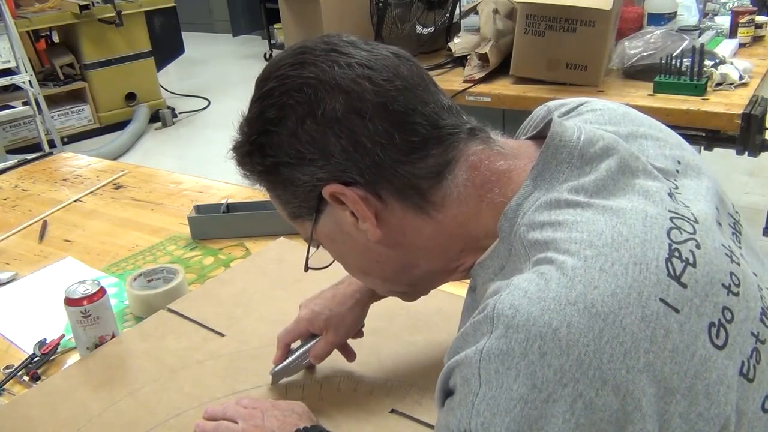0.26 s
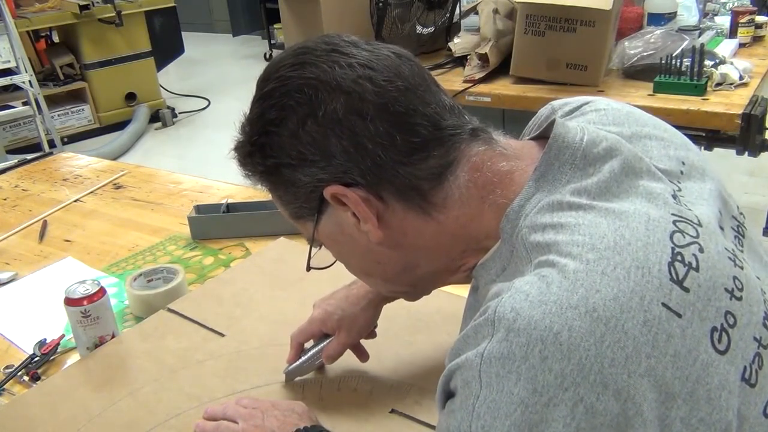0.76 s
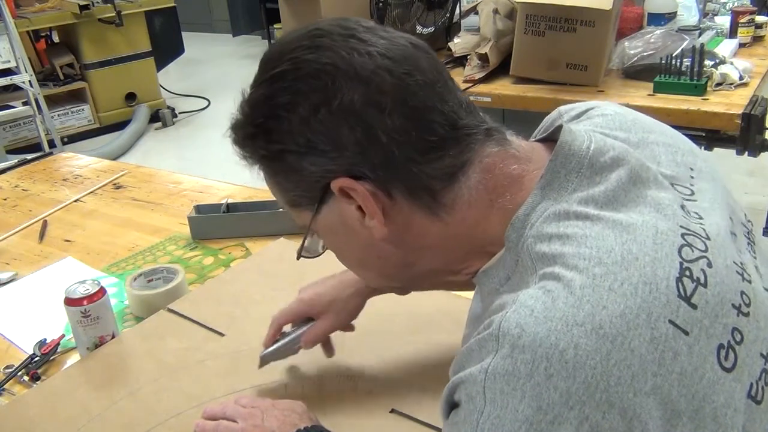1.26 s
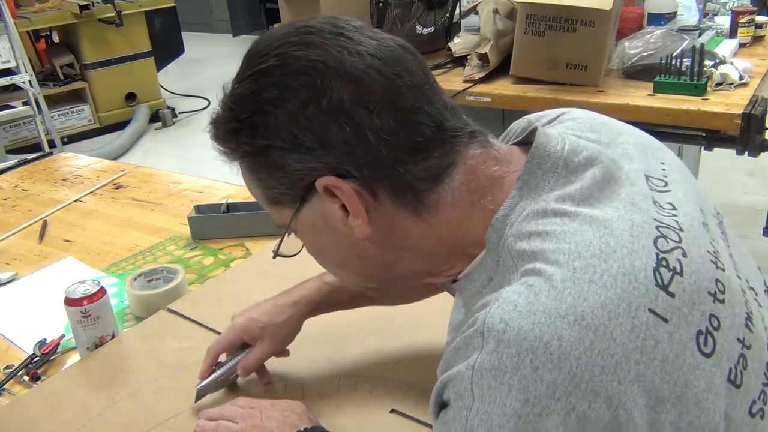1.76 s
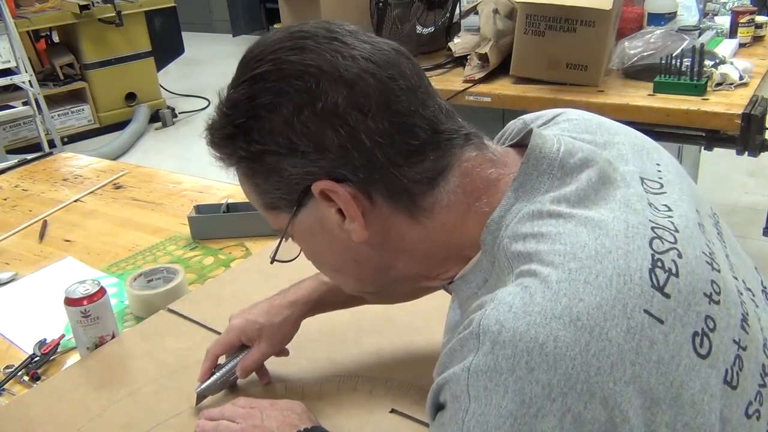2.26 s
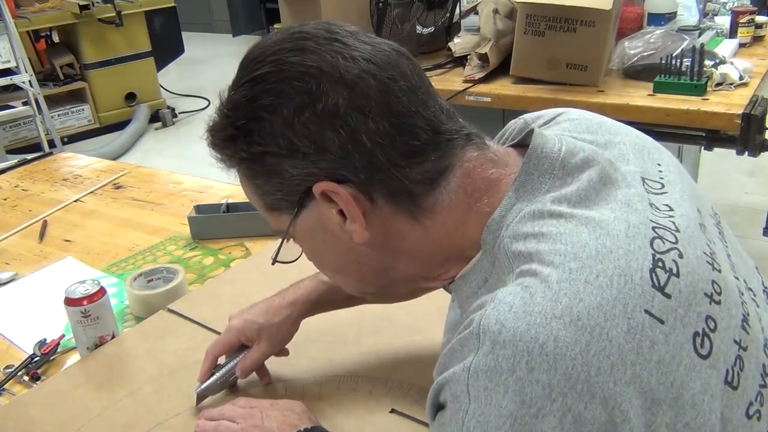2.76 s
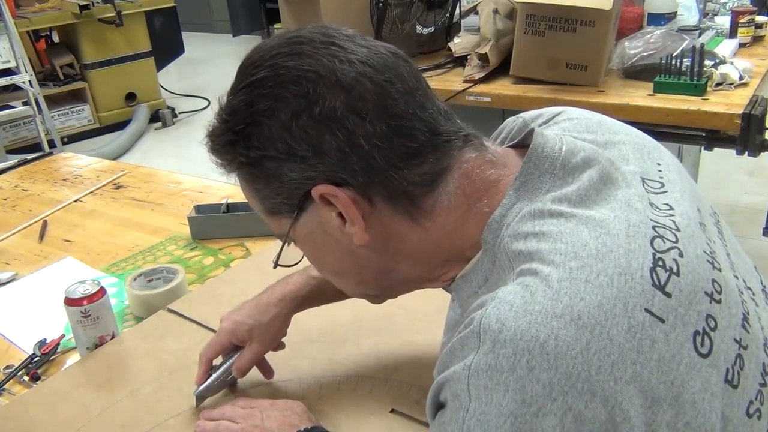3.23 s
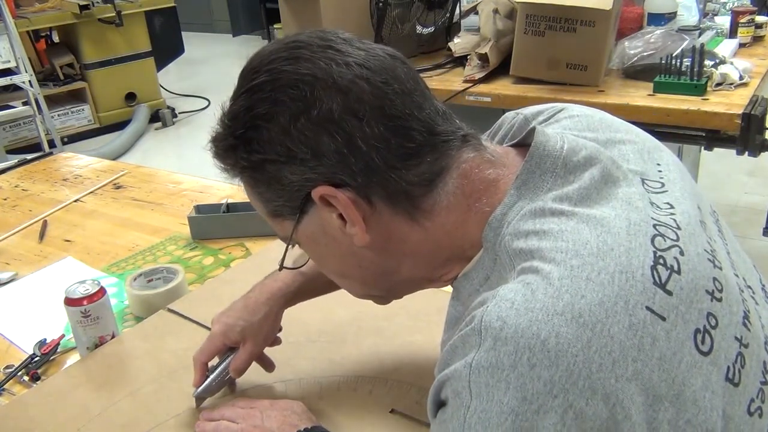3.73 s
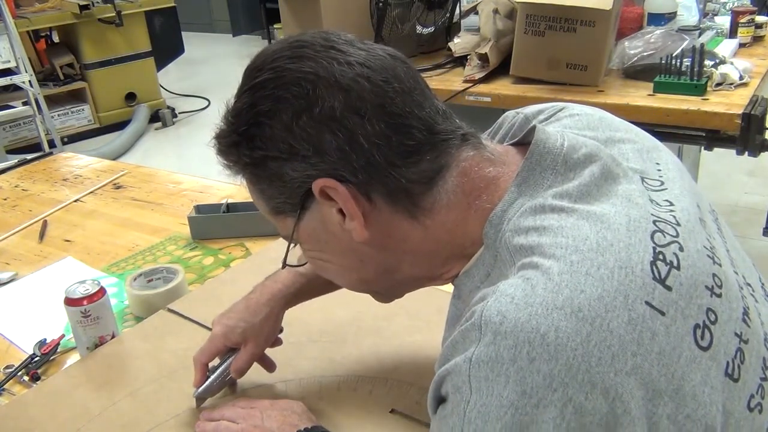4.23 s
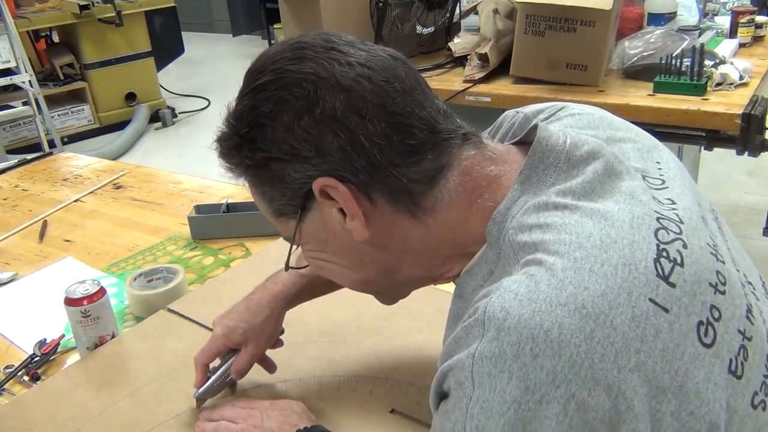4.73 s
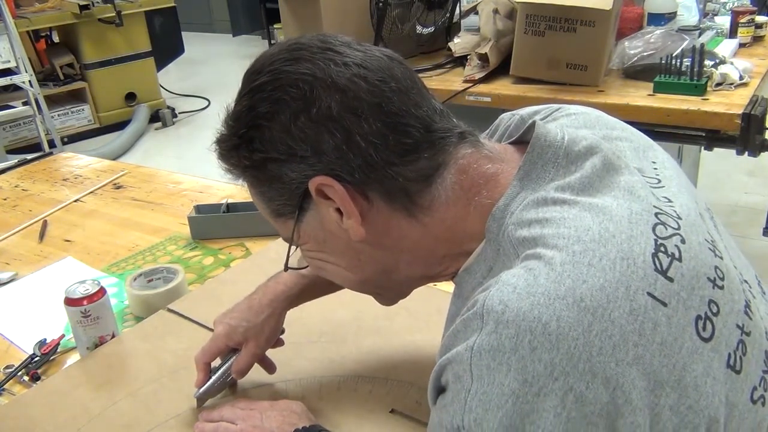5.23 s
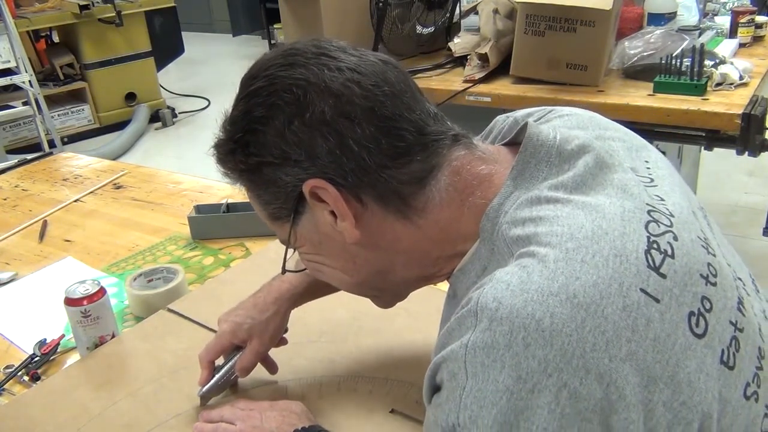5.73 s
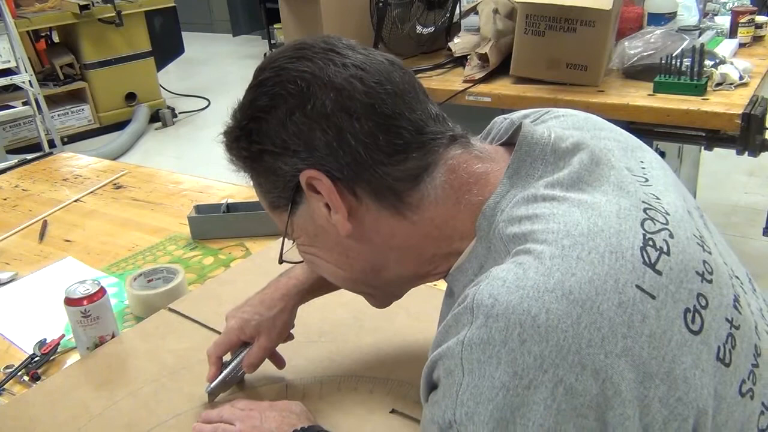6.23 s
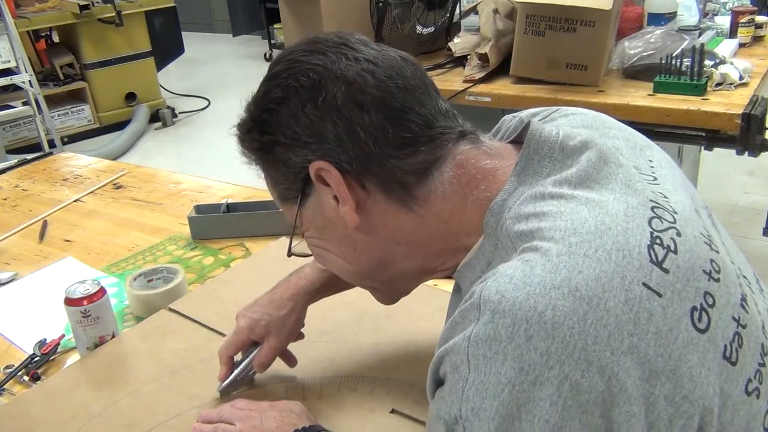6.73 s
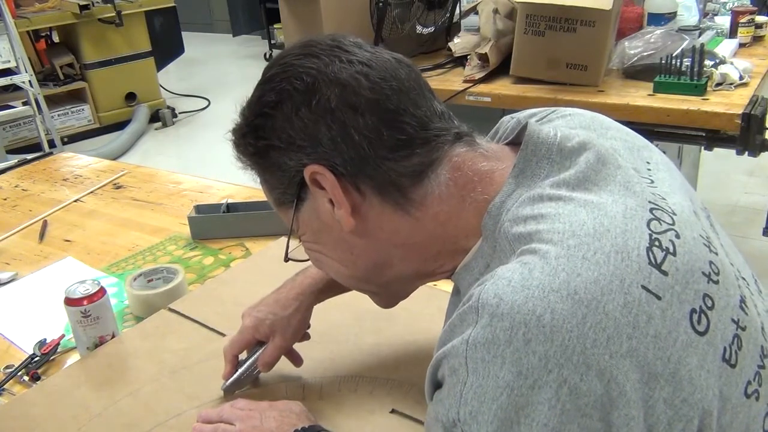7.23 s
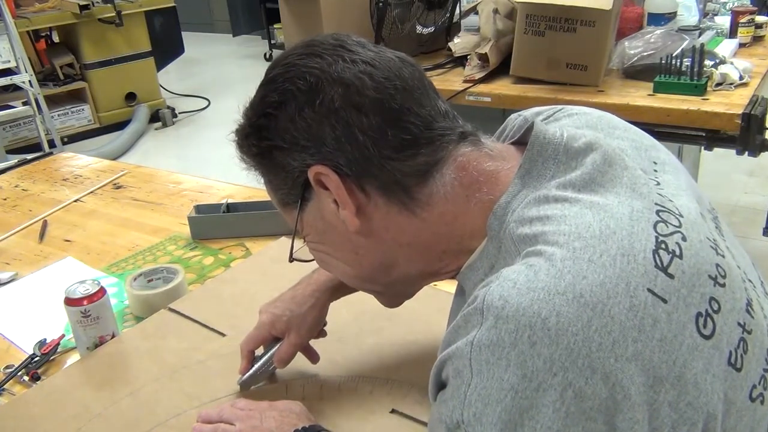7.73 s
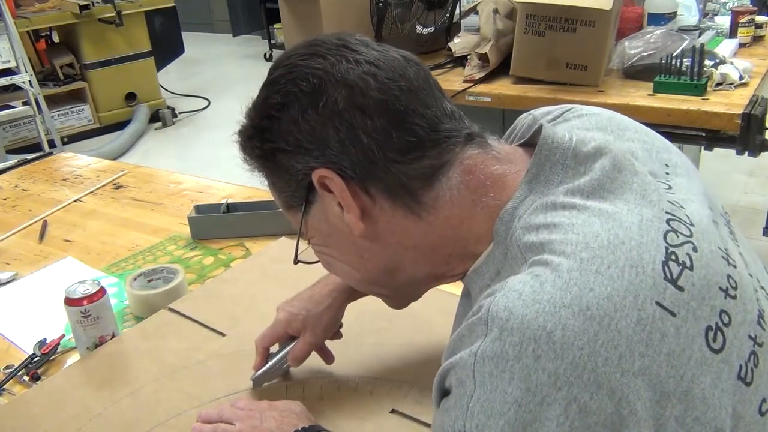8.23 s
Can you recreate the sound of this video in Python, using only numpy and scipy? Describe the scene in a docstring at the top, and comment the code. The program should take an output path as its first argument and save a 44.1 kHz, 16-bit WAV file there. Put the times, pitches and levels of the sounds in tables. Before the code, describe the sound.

A utility knife cuts thick cardboard on a workbench, close up and dry. Workshop ventilation rumbles softly throughout, with faint rapid mechanical ticking and a thin, very high whine. For the first second or so, short strokes make a dense, papery rasp with brief rips and sharp clicks, the strongest near 0.7 seconds. At about 1.5 seconds the knife body touches down with a light metallic tap amid a soft scrape. A pause follows, leaving only the background. At about 3 seconds a cluster of clicks restarts the cut, and the blade creeps on quietly, single fibres ticking. Between 5 and 5.7 seconds a few small hollow pops sound as the cardboard caves in, with a sharp snap near 5.6. From about 6 seconds the background sinks and short, jerky ripping strokes return, continuing unevenly until the end at about 8.5 seconds.

```python
"""A utility knife saws through thick cardboard on a workbench, close up. From the start, ventilation
rumbles, a small mechanism ticks faintly and a thin whine sits on top. Short strokes part the fibres in a
dense rasp, the blade jerks forward in brief rips, and the knife body touches down once. After a pause
the blade creeps on from about 3 s: lone fibres tick and a few flutes cave in with hollow pops.
From about 6 s the background sinks and short, ripping strokes return."""
import sys
import numpy as np
from scipy import signal
from scipy.fft import rfft, irfft
from scipy.io import wavfile
from scipy.ndimage import uniform_filter1d

SR = 44100
rng = np.random.default_rng(int(sys.argv[2]) if len(sys.argv) > 2 else 0)


def waveform_to_disk(signal):
    """Save audio, clipped to [-1, 1], as 16-bit WAV at the path in sys.argv[1]."""
    frames = np.transpose(np.atleast_2d(signal))
    scaled = np.clip(frames, -1, 1) * 32767
    samples = np.round(scaled).astype(np.int16)
    wavfile.write(sys.argv[1], SR, samples)


N = 373968
HZ = np.fft.rfftfreq(N, 1 / SR)
TIME = np.arange(N) / SR


def undb(db):
    """Decibels to gain."""
    return 10 ** (np.asarray(db) / 20)


def level(x, db):
    """Scale to an rms level."""
    return x * undb(db) / np.sqrt(np.mean(x ** 2))


def eq_curve(table):
    """Spread (f/Hz, level/dB) points over the FFT bins."""
    hz, db = np.transpose(table)
    return np.interp(np.log(HZ + 1), np.log(hz), db)


def colour(x, table):
    """Shape a sound with an EQ curve."""
    return irfft(rfft(x) * undb(eq_curve(table)), N)


def ring(x, modes, sway={}):
    """Damped resonances of alternating sign; sway rides single modes over time (index: gain/dB)."""
    s = 1j * HZ
    gains = [(-1) ** k * undb(db) * s * width / (s * s + s * width + hz * hz)
             for k, (hz, width, db) in enumerate(modes)]
    response = sum(gains)
    swell = sum(rfft(x * (undb(db) - 1)) * gains[k] for k, db in sway.items())
    return irfft((rfft(x) * response + swell) / np.sqrt(np.mean(np.abs(response) ** 2)), N)


def ping(at, peak_db, hz, width_hz):
    """One struck mode: the wider it is, the sooner it dies."""
    t = np.maximum(TIME - at, 0)
    return undb(peak_db) * np.exp(-np.pi * width_hz * t) * np.sin(2 * np.pi * hz * t)


def drift(rate_hz):
    """Smooth random modulation with a spread of 1."""
    hold = int(SR / rate_hz)
    steps = np.repeat(rng.standard_normal(N // hold + 1), hold)
    smooth = uniform_filter1d(uniform_filter1d(steps, hold), hold)[:N]
    return smooth / smooth.std()


def stereo_noise(width):
    """Noise of a spread-out source, mostly alike in both ears."""
    mid, side = rng.standard_normal((2, N))
    return np.array([mid + width * side, mid - width * side]) / np.hypot(1, width)


def ventilation():
    """Air rumbles and the ducts ring in slow swells; the bass is centred, the treble wide."""
    # moving air: f/Hz, relative density/dB
    air_spectrum = [(15, -56), (33, -17), (138, -2), (252, -12), (296, -8), (746, -31), (878, -34),
                    (1320, -42), (1640, -43.5), (2210, -46), (3410, -49.5), (3810, -51), (12200, -59),
                    (15200, -56), (16500, -69)]
    # duct modes: f/Hz, width/Hz, gain/dB
    duct_modes = [(112.5, 13.8, -1.5), (138.2, 15.7, 2.5), (219.1, 12.8, -1), (303.3, 15.4, -6),
                  (448.7, 24.7, -16), (864, 21.6, -25), (1082, 66, -34.5), (1613, 19, -36.5)]
    # air that only one side hears: f/Hz, level/dB re shared air
    apart = [(30, -22), (100, -20.5), (300, -17.5), (1000, 0), (3000, 3.0), (8000, 8.5)]
    mid, left, right = (colour(rng.standard_normal(N), air_spectrum) for _ in range(3))
    air = mid + np.array([colour(left, apart), colour(right, apart)])
    ducts = ring(rng.standard_normal(N), duct_modes)
    ducts = signal.sosfilt(signal.butter(2, 80., "high", fs=SR, output="sos"), ducts)
    return level(air, -3.03) + level(ducts, -3.5) * undb(3.56 * drift(3.15))


def mechanism():
    """Evenly timed ticks of uneven strength ring one small resonance, over a weak tone."""
    # steady tone: f/Hz, level/dB re rumble
    partials = [(1631, -42)]
    rate_hz, ring_hz = 29.97, 3372
    beat = np.diff(np.floor((TIME - .0125) * rate_hz), prepend=0)
    beat = beat * undb(3.2 * rng.standard_normal(N))
    tick = ring(ring(beat, [(ring_hz, 100, 0)]), [(ring_hz, 500, 0)])
    tone = sum(undb(db) * np.sqrt(2) * np.sin(2 * np.pi * hz * TIME) for hz, db in partials)
    return level(tick, -39.0) + tone


def whine(pitch_hz=15734.3, flutter_hz=12.92):
    """A thin, very high tone that flutters evenly."""
    flutter = 1 + .5 * np.cos(2 * np.pi * flutter_hz * (TIME - 2.046))
    return flutter * np.sin(2 * np.pi * pitch_hz * TIME)


def reflections(x, t60_s):
    """Short diffuse tail of bench and walls, different in each ear."""
    t = np.arange(SR // 2) / SR
    tail = rng.standard_normal((2, len(t))) * 10 ** (-3 * t / t60_s) * (t > .0004)
    return signal.fftconvolve(x[None], tail / np.sqrt(np.sum(tail ** 2) / 2), axes=1)[:, :N]


def knife_tap(at=1.4895):
    """The knife body touches down with a small metallic ring."""
    # knife body modes: peak/dB, f/Hz, width/Hz
    body_modes = [(-39, 3360, 16), (-37, 3240, 60)]
    return sum(ping(at, *mode) for mode in body_modes)


def flute_pops():
    """Flutes of the cardboard cave in, each with a hollow pop."""
    # collapsing flutes: t/s, peak/dB, f/Hz
    pops = [(4.957, -32, 1240), (5.104, -25, 1050), (5.428, -33, 1410), (5.706, -28, 1350)]
    return sum(ping(*pop, width_hz=60) for pop in pops)


def shares(level_db, board_db, bright_db):
    """Power for board, paper edge and blade; brightness tips the balance from edge to blade."""
    top = 1 / (1 + undb(-bright_db) ** 2)
    return undb(level_db) ** 2 * np.array([undb(board_db) ** 2, 1 - top, top])


def fibres(rate_hz, scatter_db, decay_ms):
    """Grain envelope of breaking fibres: random clicks of scattered size, each dying fast; rms 1."""
    breaks = rng.random(N) < rate_hz / SR
    sizes = undb(scatter_db * np.minimum(rng.exponential(size=N), 4))
    return level(signal.lfilter([1], [1, -np.exp(-1000 / (decay_ms * SR))], breaks * sizes), 0)


def clicks(stroke_bright_db):
    """Sharp clicks, as spikes of power: fibres snapping, and the click of the knife touching down."""
    # sharp clicks: t/s, level/dB, board tone/dB re level
    events = [(0.17, -30.5, -18), (0.222, -38, -15.5), (0.246, -32, -9), (0.3125, -17, -14),
              (0.5277, -23, -11), (0.585, -30, -9), (0.713, -12, -18), (1.4894, -38.5, 11.5),
              (2.9749, -22, -2), (2.9815, -28, -7), (2.9876, -23, -5), (3.0265, -18.5, 4), (3.042, -30, -8),
              (3.055, -20, -0.5), (3.0612, -22.5, -1.5), (3.066, -30, -2), (3.132, -24, -2),
              (3.1369, -16, -3), (3.151, -18, 2.5), (3.181, -30, -12), (3.194, -29, 0), (3.245, -15, 0),
              (3.2608, -22, -16), (3.5738, -30, -8), (3.622, -38.5, -10), (3.7051, -36.5, -9),
              (3.803, -35, -8), (4.1068, -38.5, 3), (4.377, -33, -8), (4.427, -34, -14), (4.482, -30, 0),
              (4.5313, -27, -3), (4.592, -31.5, -4), (4.7676, -35.5, -7), (5.283, -29, -5),
              (5.3, -28.5, -1), (5.3142, -20.5, -6.5), (5.486, -27, -9), (5.63, -13.5, -19),
              (5.641, -31, -10), (5.969, -27, -12), (6.0752, -31, -14), (6.505, -20, -6), (6.6274, -23, -1)]
    t = np.arange(SR // 40) / SR
    spike = (np.exp(-t / 0.001) - np.exp(-t / 0.000091)) ** 2
    power = np.zeros((3, N))
    for at, click_db, board_db in events:
        i = int((at - .0008) * SR)
        bright_db = 0.94 * stroke_bright_db[i] + 3.0  # a click takes the colour of its stroke
        power[:, i:i + len(t)] += 2.4 * np.outer(shares(click_db, board_db, bright_db), spike)
    return power


def rips():
    """The blade jerks forward and tears many fibres at once: brief, fine-grained humps of power."""
    # jerks: centre t/s, level/dB, length/ms, board tone/dB re level, brightness/dB
    jerks = [(0.301, -15, 9.7, -6, -2), (0.4, -29.5, 51, -8, 4), (0.508, -36.5, 7.1, -8, 12),
             (0.63, -21, 17.3, -4.5, -5), (0.697, -19, 9.3, -3.5, 1.5), (5.069, -30, 8.2, -1.5, -6),
             (5.617, -16, 6, -1, -3.5), (6.127, -23, 11.3, -1.5, 3), (6.15, -22, 10, -8, 8),
             (6.412, -17, 7, 1.5, -1.5), (6.448, -20, 1.9, -7, -5), (6.478, -30, 4.1, 5, -1),
             (6.487, -23, 6.6, 3, 0.5), (6.704, -27, 5.4, -8, -3), (7.266, -34, 14, -10, -3),
             (7.298, -29, 10.6, 1, -1), (7.514, -32.5, 5.3, -4, 1), (7.568, -30.5, 19, 0.5, 1),
             (7.725, -29.5, 5.2, -2, 3), (7.785, -27.5, 9.8, 0.5, 3), (8.014, -26.5, 3.9, -4, -5),
             (8.079, -34, 19, 1.5, -3), (8.266, -33, 19, -3, 3), (8.344, -32.5, 17, 3, 0)]
    power = np.zeros((3, N))
    for at, rip_db, length_ms, board_db, bright_db in jerks:
        hump = np.hanning(int(2.56 * length_ms * SR / 1000)) ** 2
        i = int(at * SR) - len(hump) // 2
        power[:, i:i + len(hump)] += 1.18 * np.outer(shares(rip_db, board_db, bright_db), hump)
    return power * fibres(rate_hz=8000, scatter_db=0.65, decay_ms=0.58) ** 2


def strokes():
    """Each push rises, holds and dies away; gives power for board, edge and blade, and brightness/dB."""
    # pushes of the blade: full pressure t/s, hold/ms, level/dB, rise/ms per 20 dB,
    # board tone/dB re level, brightness/dB
    pushes = [(.094, 5, -43, 283, -2.5, 1.5), (.3, 3.4, -32.5, 29, 2.5, -3), (.412, 3.6, -41, 147.5, 2, 3),
              (.47, 190, -40.5, 60, -3.5, 1), (.704, 5.7, -35, 150, -3, -3), (0.811, 1, -30, 79, -4.5, 0),
              (.87, 65, -59.5, 53, -25.5, -8), (.996, 67, -41.5, 93, -23, -4), (1.1, 5, -33.5, 228, -3, 11),
              (1.35, 92, -43.5, 100, -1, 3), (1.55, 31, -43, 100, 1, 4), (2.979, 64, -42.5, 23, 3.5, -3.5),
              (3.145, 9, -40, 92, 6, -3.5), (3.258, 6.4, -40, 48, 4, -2.5), (3.675, 5, -49.5, 324, 1, -2),
              (3.85, 440, -55.5, 150, -2, 0), (4.419, 5.6, -44.5, 338, 1.5, 2),
              (5.073, 8, -41.5, 404, 1, -1), (5.3, 190, -44, 204, 1, 0.5), (5.469, 2, -38.5, 98, 1.5, -2),
              (5.59, 6.6, -46, 157, 0, -5), (5.621, 1.8, -27, 53, -2.5, -5), (5.72, 79, -42.5, 65, -1, -1),
              (6.11, 5, -41, 311, 2.5, 0), (6.14, 9.5, -31, 27, 3.5, 3), (6.19, 12, -57, 30, 0, 2),
              (6.39, 10, -46.5, 127, 4, 4), (6.413, 94, -38, 12, 2.5, -4), (6.63, 72, -40, 10, -4, 0.5),
              (6.712, 2.5, -36, 75, 1.5, -2), (6.9, 49, -46.5, 29, -1, -0.5),
              (7.298, 3, -31.5, 61, -0.5, -2), (7.52, 77, -38, 35, -1, 0), (7.63, 16, -44, 30, 0, -2),
              (7.729, 49, -32.5, 29, -3.5, -2), (8.021, 44, -33.5, 66, -4, 0.5),
              (8.13, 48, -47.5, 40, -1.5, 0), (8.346, 12, -36, 171, -2.5, 0)]
    # the blade catches and the stroke stops dead: t/s
    catches = [1.108, 3.8, 6.135]
    t = TIME[::44]
    power, bright = np.zeros((3, len(t))), np.zeros(len(t))
    for at, hold_ms, rasp_db, rise_ms, board_db, bright_db in pushes:
        fall_ms = max(80.5, 0.99 * rise_ms)  # a slow push fades about as slowly as it rose
        since_ms = 1000 * (t - at)
        drop_db = 20 * np.maximum(np.maximum(-since_ms / rise_ms, (since_ms - hold_ms) / fall_ms), 0)
        moving = t < min([s for s in catches if s > at], default=np.inf)
        push = np.outer(shares(rasp_db, board_db, bright_db), moving * undb(-drop_db) ** 2)
        power += push
        bright += bright_db * (push[1] + push[2])
    bright /= power[1] + power[2] + 1e-30
    return np.array([np.interp(TIME, t, p) for p in power]), np.interp(TIME, t, bright)


def rasp(power, creep_s=(3.1, 6.1)):
    """Grain on the strokes' power: a fast blade parts fibres in a stream, a creeping one singly."""
    power = power * undb(1.5 * drift(120)) ** 2  # stick and slip: the drag stutters
    drag_db = 10 * np.log10(power[1] + power[2] + 1e-30)
    power = power * undb(2.0 * np.array([drift(30) for _ in range(3)]))  # the contact shifts
    creep = np.clip((-39 - drag_db) / 12, 0, 1) * (TIME > creep_s[0]) * (TIME < creep_s[1])
    dense = fibres(rate_hz=5000, scatter_db=4.6, decay_ms=0.67)
    sparse = fibres(rate_hz=450, scatter_db=4.5, decay_ms=0.4)
    return power * ((1 - creep) * dense + creep * sparse) ** 2


def knife_cut():
    """Rasp, rips and clicks drive noise that rings the board, the cut paper edge and the blade tip."""
    # modes of the three parts: f/Hz, width/Hz, gain/dB
    board_modes = [(582, 58, 8), (1032, 96, 15), (1235, 79, 12), (1412, 460, 6), (1989, 185, 8),
                   (2710, 450, 4)]
    edge_modes = [(3690, 480, -5.5), (4400, 380, -1), (5050, 610, -1), (5755, 344, 2), (6900, 790, -0.5)]
    blade_modes = [(8130, 1140, 2), (9610, 920, 1), (11470, 1750, -2), (14100, 1500, -10.5)]
    # modes swell as the cut moves on: t/s, board 2nd/dB, board 3rd/dB, edge 4th/dB, blade 2nd/dB
    mode_rides = [(1.6, -0.5, -0.5, 0, 2), (2.9, 4, 1.5, 8, 2), (3.5, -2, 2, 0, 3.5),
                  (4.7, -0.5, 0, 0.5, 3), (5.8, -1.5, -4.5, -0.5, 2), (6.2, -3.5, 4.5, 2, 0.5)]
    stroke_power, bright_db = strokes()
    power = rasp(stroke_power) + rips() + clicks(bright_db)
    board_drive, edge_drive, blade_drive = np.sqrt(power)
    times, *rides_db = np.transpose(mode_rides)
    low_db, high_db, edge_db, tip_db = (np.interp(TIME, times, db) for db in rides_db)
    board = ring(board_drive * stereo_noise(width=.22), board_modes, {1: low_db, 2: high_db})
    edge = ring(edge_drive * stereo_noise(width=.4), edge_modes, {3: edge_db})
    blade = ring(blade_drive * stereo_noise(width=.42), blade_modes, {1: tip_db})
    return board + edge + blade


def scene():
    """The knife and its reflections over the workshop bed."""
    # the bed sinks and creeps back while the whine fades: t/s, bed fader/dB, whine fader/dB
    faders = [(0, -24, -52), (.42, -27, -52), (2.9, -26.5, -52), (3.3, -29, -52), (6.05, -25.5, -56),
              (6.2, -33, -59), (7.6, -31, -57), (8.48, -27.5, -65)]
    times, bed_db, whine_db = np.transpose(faders)
    cut = knife_cut() + knife_tap() + flute_pops()
    bed = (ventilation() + mechanism()) * undb(np.interp(TIME, times, bed_db) + 2.0)
    top = whine() * undb(np.interp(TIME, times, whine_db))
    return bed + top + cut + undb(-8) * reflections(cut[0], t60_s=0.072)


def record(dry):
    """The left microphone is the weaker one; the loudest peaks are rounded; the top is cut."""
    # microphone imbalance: f/Hz, left minus right/dB
    imbalance = [(50, -2), (500, -7), (2400, -6.5), (6000, -3), (15000, -9)]
    top_hz = 16200
    lean_db = np.array([1, -1])[:, None] * eq_curve(imbalance) / 2
    rounded = np.tanh(irfft(rfft(dry) * undb(lean_db), N))
    return signal.sosfilt(signal.ellip(10, .2, 70, top_hz, fs=SR, output="sos"), rounded)


dry = scene()
out = record(dry)
waveform_to_disk(out)
```